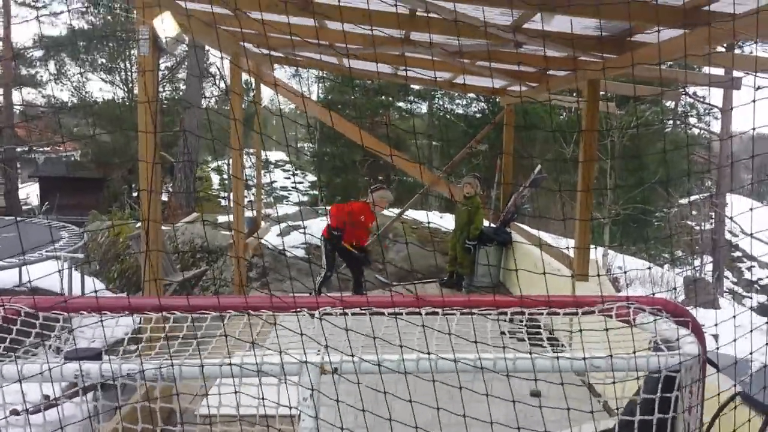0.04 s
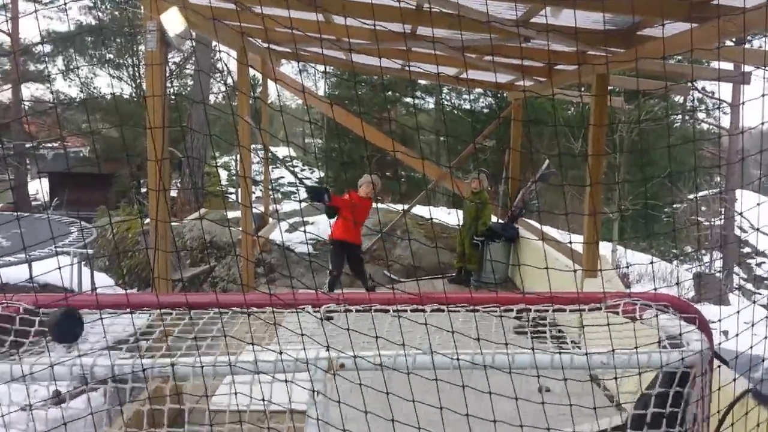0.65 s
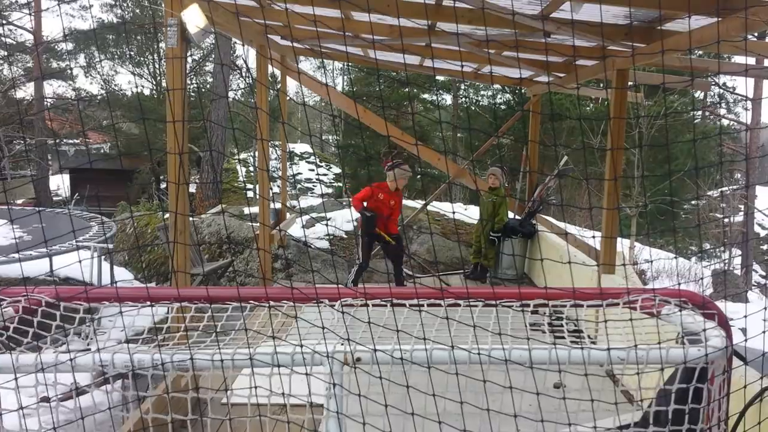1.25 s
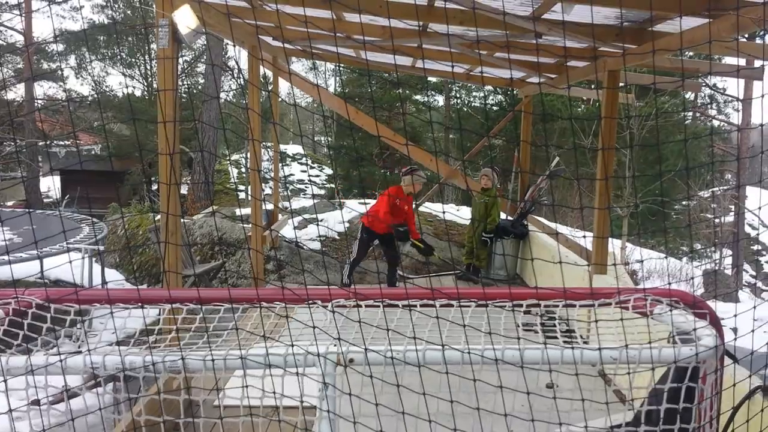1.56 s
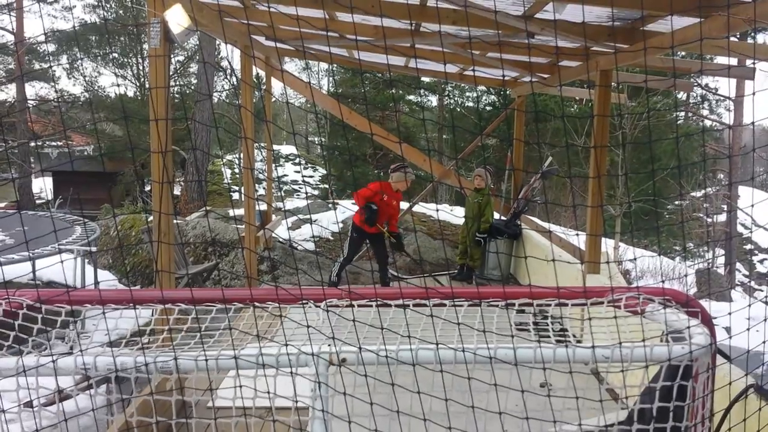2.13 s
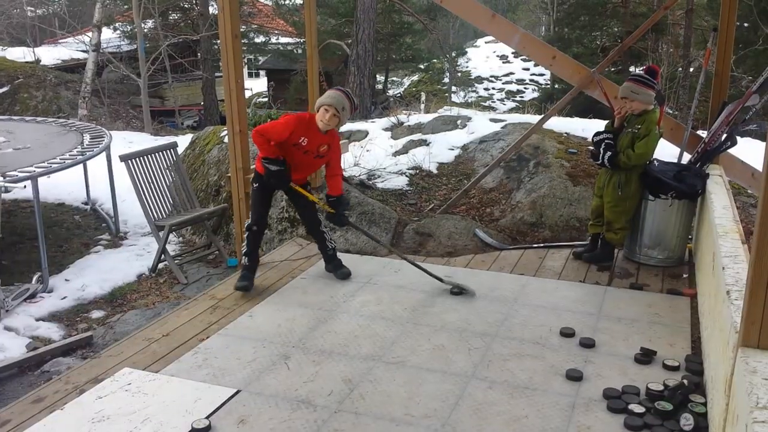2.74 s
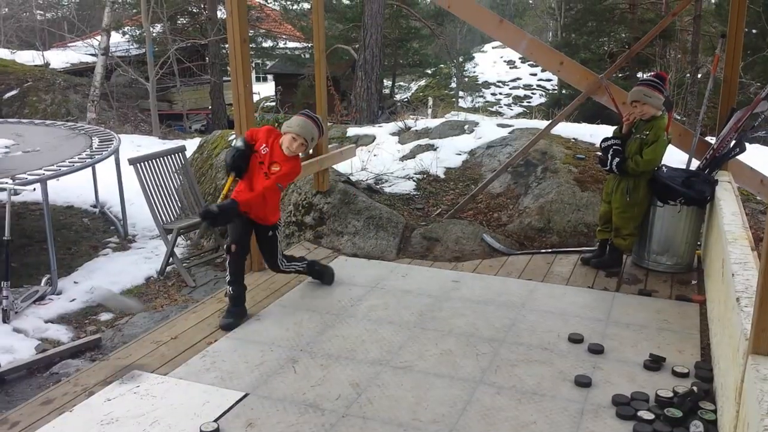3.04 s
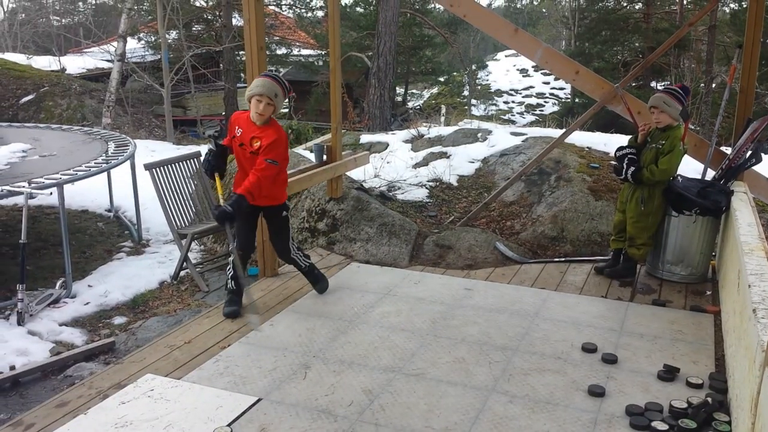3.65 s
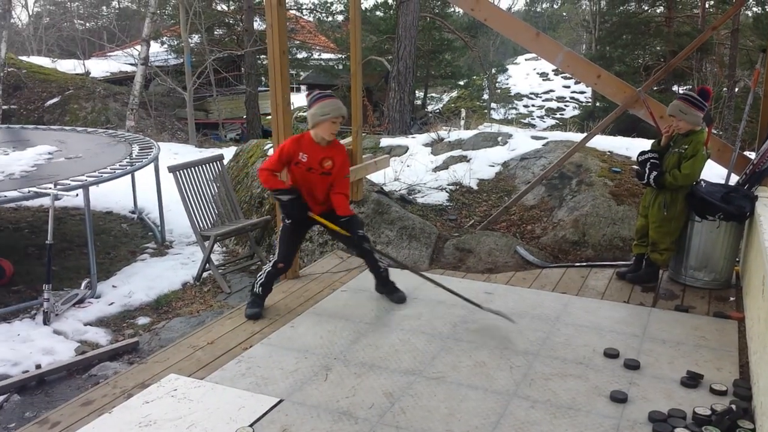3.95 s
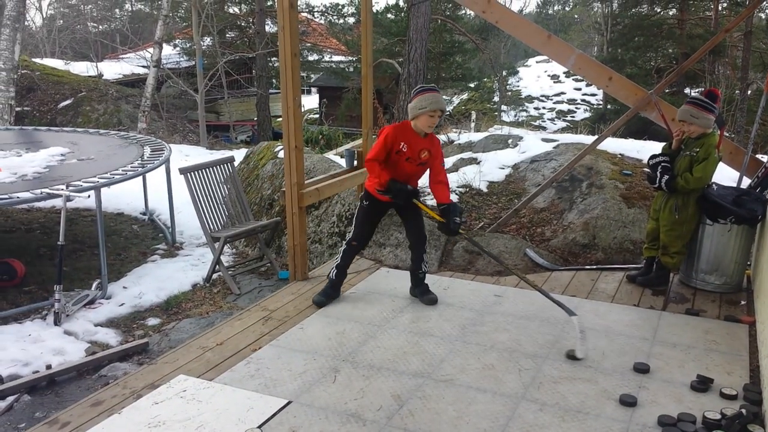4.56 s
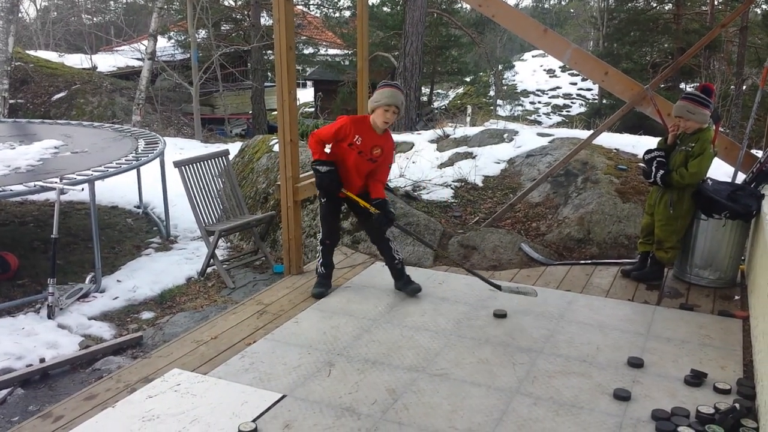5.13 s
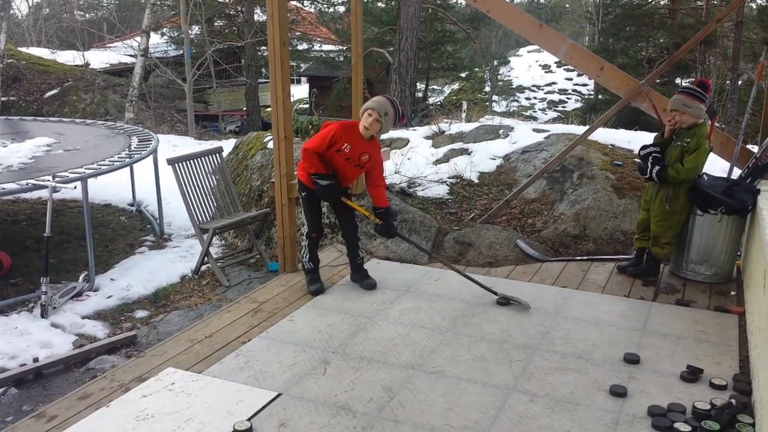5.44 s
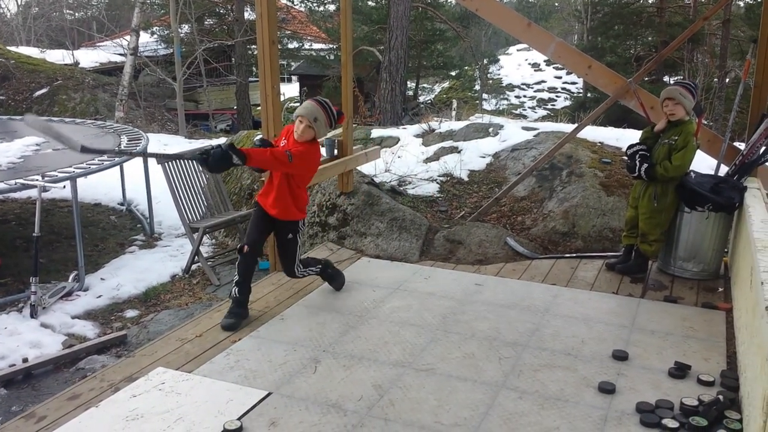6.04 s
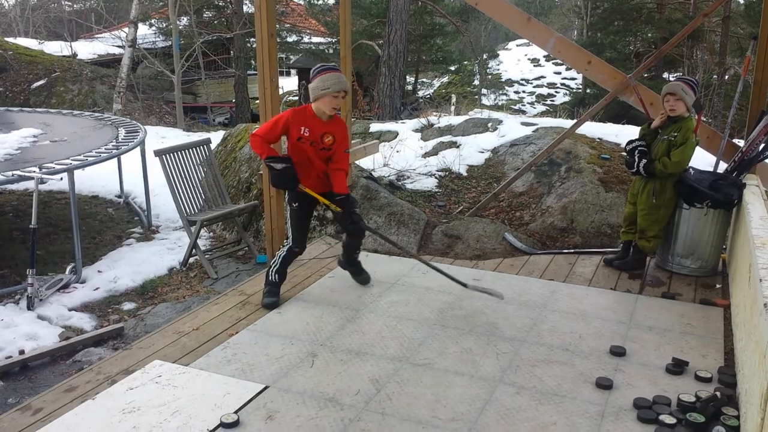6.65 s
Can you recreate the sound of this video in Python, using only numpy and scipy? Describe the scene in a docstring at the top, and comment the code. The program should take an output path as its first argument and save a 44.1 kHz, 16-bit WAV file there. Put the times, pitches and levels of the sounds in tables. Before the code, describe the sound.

A hockey stick rasps over hollow plastic tiles and slaps a puck at about 0.3 seconds. At 0.7 the puck hits a steel goal with a short ring and a net swish, then bounces on planks. Faint taps and scrapes follow, with a brief squeak at 2.2 and two sharp clacks just after. A stronger scrape and slap around 3 seconds send a louder crash into the goal at 3.5, and the puck thuds on wood until about 4.1. Light taps lead into a long drag, with hard clacks near 5 and 5.5 seconds. A scrape swells to a snap just before 6, soles scuff, and a loud knock lands at 6.7. The wooden deck rumbles and booms under feet and hits, more in the second half. Everything is in stereo, with short reflections from the roof over a very faint outdoor hush.

```python
"""A hockey stick taps pucks, drags them over plastic tiles and snaps them away on a roofed backyard rink.
Impact excites the resonances of blade and hollow tiles; stick-slip friction makes them rasp and squeak.
Two shots crash into the goal, whose steel frame rings and net swishes, and the pucks thud on the planks.
The wooden deck rumbles and booms under feet and hard hits; soles scuff; roof and boards scatter blows.
Two small microphones pick this up over the faint hush of the woods."""
import sys
import numpy as np
from scipy import signal
from scipy.fft import rfft, irfft, next_fast_len
from scipy.io import wavfile
from scipy.ndimage import uniform_filter1d, map_coordinates

SR = 44100
rng = np.random.default_rng(int(sys.argv[2]) if len(sys.argv) > 2 else 0)


def file_out(sig):
    """Save sig as 16-bit WAV at sys.argv[1]."""
    # one column per channel
    cols = np.atleast_2d(sig).T
    # limit, then scale
    lim = np.clip(cols, -1, 1)
    pcm = np.round(lim * 32767).astype(np.int16)
    wavfile.write(sys.argv[1], SR, pcm)


N = 303849

# Resonances of blade and hollow tiles. Each row: centre in Hz, width in Hz, peak height in dB.
PAD_MODES = [(98, 19, 6), (274, 21, 4), (403.3, 57, 4), (476, 35, 3), (643.6, 120, 1), (725, 45, 0.5),
             (906, 45, 3), (1938, 91, 5), (2440, 230, 1.5), (4200, 390, 2.5), (4970, 570, 3.5)]
# Spectral envelope of the blade. Each row: frequency in Hz, relative level in dB.
BLADE_SPECTRUM = [(40, -27.5), (70, -6), (220, -6), (340, -8.5), (430, -4.5), (680, -1.5), (1000, -7.5),
                  (1420, -9), (2100, -5), (3100, -10), (6000, -16.5), (8000, -12.5), (12000, -34.5),
                  (14500, -49.5)]
# The puck hitting the goal. Each row: start in seconds, knock level in dB, thump and clack over knock
# in dB, knock resonance in Hz, frame ring in dB, ring tilt in dB per octave, ring length factor,
# net level in dB.
GOAL_HITS = [(0.726, -27, -9, 8.5, 810, -26.5, 1.5, 1, -34.5),
             (3.463, -15.5, -25.5, 4, 780, -21.5, -20, 0.63, -24)]


def amp(db):
    """Decibels to amplitude ratio."""
    return 10 ** (np.asarray(db) / 20)


def unit(x):
    """Normalise to rms 1."""
    return x / np.sqrt(np.mean(x ** 2) + 1e-20)


def along(points, hz):
    """Interpolate (Hz, value) points on a logarithmic frequency axis."""
    f, v = np.transpose(points)
    return np.interp(np.log(hz + 1), np.log(f + 1), v)


def wobble(rate, size=N):
    """Random modulation: a smooth curve through rate Gaussian knots a second."""
    knots = rng.standard_normal(int(size * rate / SR) + 4)
    return map_coordinates(knots, [np.arange(size) * rate / SR])


def filtered(x, response):
    """Linear filtering: multiply the spectrum by a frequency response."""
    m = next_fast_len(x.shape[-1] + SR // 8)
    return irfft(rfft(x, m) * response(np.fft.rfftfreq(m, 1 / SR)), m)[..., :x.shape[-1]]


def register(hz, index):
    """Band-pass gain of one register: 0 thump, 1 knock, 2 clack, 3 crack."""
    # The edges of the four registers in Hz, from low to high.
    edges = [35, 300, 1200, 5500, 14500]
    return ((1 + (edges[index] / (hz + 1)) ** 10) * (1 + (hz / edges[index + 1]) ** 10)) ** -.5


def peaks_db(resonances, hz):
    """Resonance: each mode adds a Lorentzian peak to the gain in dB."""
    return sum(db / (1 + (2 * (hz - centre) / width) ** 2) for centre, width, db in resonances)


def minimum_phase(gain, size=4096):
    """Causality: the minimum-phase impulse response of a body with this gain over frequency."""
    cepstrum = irfft(np.log(gain(np.fft.rfftfreq(size, 1 / SR)) + 1e-6))
    cepstrum[1:size // 2] *= 2
    cepstrum[size // 2 + 1:] = 0
    return irfft(np.exp(rfft(cepstrum)))


def pair_noise(size=N):
    """Spatial coherence: white noise at two microphones, alike in the bass, unrelated in the treble."""
    # Each row: frequency in Hz, correlation between left and right.
    coherence = [(60, .62), (130, .8), (280, .975), (650, .96), (1050, .62), (1550, -.35), (2200, .35),
                 (3100, 0), (14000, .03)]

    def mid_side_gains(hz):
        angle = np.arccos(np.clip(along(coherence, hz), -1, 1)) / 2
        return np.array([np.cos(angle), np.sin(angle)])
    mid, side = filtered(rng.standard_normal((2, size)), mid_side_gains)
    return np.array([mid + side, mid - side])


def coloured_noise(spectrum, size=N):
    """Spectral shaping: stereo noise of rms 1 with an envelope of (Hz, dB) points."""
    return unit(filtered(pair_noise(size), lambda hz: amp(along(spectrum, hz))))


def add(track, start, sound):
    """Superposition: mix a sound in at a start time in seconds."""
    part = track[:, round(start * SR):][:, :sound.shape[-1]]
    part += sound[..., :part.shape[-1]]


def air():
    """Ambient noise: the faint steady hush of the woods."""
    # Each row: frequency in Hz, relative level in dB.
    hush_spectrum = [(15, -38.5), (25, -11.5), (141, 4), (260, -3), (297, -2), (885, -7), (1470, -20),
                     (2930, -19), (4860, -14.5), (8960, -30.5), (14500, -23)]
    return amp(-63) * coloured_noise(hush_spectrum)


def deck():
    """Structure-borne sound: the deck rumbles, and booms under footfalls, stick hits and a shot."""
    # Spectral envelope of the deck. Each row: frequency in Hz, relative level in dB.
    deck_spectrum = [(15, -34.5), (25, -14), (48, 0), (107, 4), (195, -5), (230, -4), (260, -9), (307, -7),
                     (350, -18.5), (460, -35), (770, -120)]
    # The continuous rumble as the player moves. Each row: time in seconds, level in dB.
    rumble_levels = [(0.0, -47.5), (0.19, -52), (1.48, -71), (2.32, -44.5), (2.63, -54), (2.99, -51),
                     (3.22, -38.5), (4.34, -55.5), (5.1, -36.5), (5.28, -45.5), (5.74, -38), (6.39, -50),
                     (6.52, -34.5), (6.89, -40)]
    # Footfalls, hard stick hits and the shot into the goal. Each row: start in seconds, strength in dB.
    booms = [(0, -54), (0.25, -44), (0.725, -37.5), (2.27, -53), (3.0, -38), (3.11, -27), (3.63, -39),
             (3.92, -41), (4.33, -45), (4.8, -45), (4.98, -32), (5.17, -49), (5.48, -32.5), (5.7, -39),
             (5.94, -34), (6.32, -23.5), (6.6, -39), (6.7, -39)]
    rise_s, t60_s = .015, 0.87
    t = np.arange(SR) / SR
    envelope = (1 - np.exp(-t / rise_s)) * amp(-60 * t / t60_s)
    rumble_db = np.interp(np.arange(N) / SR, *np.transpose(rumble_levels))
    power = amp(rumble_db)[None] ** 2
    for start, db in booms:
        add(power, start, (amp(db) * envelope)[None] ** 2)
    return coloured_noise(deck_spectrum) * np.sqrt(power) * amp(2.4 * wobble(14))


def stroke_gains():
    """Friction noise follows the load on the stick: envelopes of hollow pad, rasp and hiss."""
    # Strokes over the tiles. Each row: start and end in seconds, final rasp level in dB,
    # swell over the stroke in dB, pad over rasp in dB, hiss over rasp in dB.
    strokes = [(-0.05, 0.031, -50.5, -4, 6, -9), (0.164, 0.305, -34, 7, -1.5, 1),
               (1.06, 1.156, -62.5, 0, -13, -1), (1.618, 1.671, -65.5, 5, -3.5, -2.5),
               (1.731, 2.06, -57, -2, 1.5, -2.5), (2.117, 2.225, -41, -2.5, -6.5, -3.5),
               (2.323, 2.487, -41.5, 1.5, 1.5, -2), (2.62, 2.908, -64, 1.5, 10, -2),
               (2.937, 3.002, -35, 7, -1.5, -1), (3.012, 3.143, -27, 5, -2, -0.5),
               (3.24, 3.31, -52.5, 0, 1, 5.5), (3.84, 3.853, -58, -1, -8, -11),
               (4.224, 4.296, -57.5, -2.5, -13, 3.5), (4.51, 4.694, -61, -6, 1.5, -1.5),
               (4.739, 5.449, -43.5, 6.5, 1, 4.5), (5.55, 5.908, -36.5, 16, -1.5, 0.5),
               (5.946, 5.969, -31.5, 3.5, 4.5, 2.5), (6.11, 6.21, -70.5, -14, -4.5, 5.5),
               (6.356, 6.362, -30.5, 5.5, -3.5, -12), (6.518, 6.568, -34, 2, -10, -9.5),
               (6.864, 6.88, -64.5, -8, 16.5, -5)]
    rise_db_per_s, fall_db_per_s = 266, 196  # the blade settles onto the tiles and leaves them
    echo_db, echo_fall_db_per_s = -15, 52.5  # reverberation under the roof
    t = np.arange(0, N, 64) / SR
    power = np.zeros((3, len(t)))
    for start, end, rasp_db, swell_db, pad_db, hiss_db in strokes:
        before, after = np.maximum(start - t, 0), np.maximum(t - end, 0)
        lean_db = rasp_db + np.interp(t, [start, end], [-swell_db, 0]) - rise_db_per_s * before
        release_db = np.maximum(-fall_db_per_s * after, echo_db - echo_fall_db_per_s * after)
        power += amp(lean_db + release_db + np.array([[pad_db], [0], [hiss_db]])) ** 2
    return [np.interp(np.arange(N) / SR, t, np.sqrt(p)) for p in power]


def patchy(x, depth_db):
    """Moving excitation: as the blade travels, different resonances of the tiles swell and fade."""
    spectrogram = signal.stft(x, nperseg=1024)[2]
    field = uniform_filter1d(rng.standard_normal(spectrogram.shape[1:]), size=4, axis=0)
    field = uniform_filter1d(field, size=6, axis=1)
    return signal.istft(spectrogram * amp(depth_db * unit(field)), nperseg=1024)[1][:, :N]


def slide():
    """Sliding friction: dense tiny slips on the tiles' fine texture also shake the hollow pad."""
    # Spectral envelope of the rubbed tiles. Each row: frequency in Hz, relative level in dB.
    tile_spectrum = [(150, -26), (330, -11.5), (480, -5.5), (700, -2.5), (1000, -12.5), (1450, -13.5),
                     (2100, -12.5), (3200, -14), (5000, -15.5), (6400, -16), (8100, -10.5), (12000, -23.5),
                     (14500, -33)]
    out = np.zeros((2, N))
    chatter_db = 0.88 * wobble(160)
    noise = pair_noise() * amp(1.2 * wobble(1500) + chatter_db)
    tile_gain = lambda hz: amp(along(tile_spectrum, hz) + peaks_db(PAD_MODES, hz))
    for index, gain in enumerate(stroke_gains(), 1):
        slips = noise * amp(1.93 * wobble(45))
        rub = filtered(slips, lambda hz: tile_gain(hz) * register(hz, index))
        out += rub / rub.mean(axis=0).std() * gain
    return patchy(out, depth_db=1.0)


def blows(rows, spectrum, resonances, t60s, contact_t60, rise_s, spiky_db, direct_db):
    """Impact: a click, a brief contact and decaying reflections, convolved with the body's response."""
    out, t = np.zeros((2, N)), np.arange(SR // 3) / SR
    level_window = SR // 40  # a blow's level is its energy spread over 25 ms
    onset = 1 - np.exp(-t / rise_s)
    for start, knock_db, thump_db, clack_db, knock_hz, contact_db, crack_db in rows:
        levels_db = knock_db + np.array([thump_db, 0, clack_db, clack_db + crack_db])
        # the spot that is struck weights the modes anew and adds a broad resonance of its own
        modes = [(centre, width, db + 3.0 * rng.standard_normal()) for centre, width, db in resonances]
        modes.append((knock_hz, knock_hz / 3, 6))
        body_gain = lambda hz: amp(along(spectrum, hz) + peaks_db(modes, hz))
        # single strong reflections stand out of the cloud
        cloud = pair_noise(len(t)) * amp(spiky_db * wobble(697.3, len(t)))
        contact = amp(contact_db - 60 * t / contact_t60)
        for index, t60 in enumerate(t60s):  # seconds to fall 60 dB, one per register
            body = minimum_phase(lambda hz: body_gain(hz) * register(hz, index))
            force = cloud * (amp(-60 * t / t60) + contact) * onset
            force[:, 0] += amp(direct_db)
            sound = signal.fftconvolve(force, body[None], axes=1)[:, :len(t)]
            rms = np.linalg.norm(sound.mean(axis=0)) / np.sqrt(level_window)
            add(out, start, sound * amp(levels_db[index]) / rms)
    return out


def stick():
    """Impulsive excitation: the blade slaps tiles and puck, and the short contact sounds many modes."""
    # Each row: start in seconds, knock level in dB, thump and clack over knock in dB,
    # knock resonance in Hz, contact over reflections in dB, crack over clack in dB.
    slaps = [(0.322, -27, -12, -6, 540, 35, -4), (0.363, -34, -16, 0, 597, 2, -9),
             (0.369, -22.5, -17, 6, 604, -7, -11), (1.111, -54, -16, -12.5, 515, 8, 8),
             (1.409, -56, -2, -2.5, 510, -17, -7), (1.438, -52, -5.5, -6, 493, 0, 4.5),
             (1.565, -70.5, -3, -6.5, 500, 12, 12.5), (1.707, -45.5, -8, -9.5, 550, -12, 0),
             (2.063, -36.5, -20, -11, 565, 4, -5), (2.11, -33.5, -10, -13, 453, -13, 5),
             (2.285, -18.5, -16.5, -2, 615, -4, -4), (2.39, -19.5, -13.5, -4.5, 540, 5, -8.5),
             (2.968, -29.5, -22, -5, 630, -8, -15), (3.037, -23.5, -12, -6.5, 495, -2, -13),
             (3.15, -17, -28, -2.5, 656, -1, -3), (4.322, -32.5, -13, -9, 520, -1, -4),
             (4.463, -34.5, -18, -10, 540, 1, -7.5), (4.978, -16.5, -12.5, -6.5, 500, -4, -1.5),
             (5.084, -20, -12.5, -9, 636, -4, -1), (5.476, -14.5, -24, -5, 850, -12, -5),
             (5.549, -28.5, -8, -2.5, 734, -2, -11), (5.639, -30.5, -4, -11, 670, -15, -17),
             (5.97, -27, -2, -7, 694, 0, -1.5), (6.03, -37.5, -13, -2, 700, 12, -30),
             (6.309, -49.5, 9, 4.5, 660, 2, 8.5), (6.694, -13, -3, -12.5, 490, -7, -12.5)]
    return blows(slaps, BLADE_SPECTRUM, PAD_MODES, t60s=[0.26, 0.25, 0.29, 0.26],
                 contact_t60=0.09, rise_s=0.00024, spiky_db=1.5, direct_db=19.5)


def shots():
    """Collision: the puck strikes the goal with a broadband crash."""
    # Spectral envelope of the goal. Each row: frequency in Hz, relative level in dB.
    goal_spectrum = [(30, 2.5), (130, -11), (280, -6.5), (520, -13), (850, -6.5), (1500, -4), (2540, 0),
                     (4640, 2), (6340, 0.5), (7750, 6), (14500, -13)]
    contact_db, crack_db = 8, -3
    rows = [(*row[:5], contact_db, crack_db) for row in GOAL_HITS]
    return blows(rows, goal_spectrum, resonances=[], t60s=[0.38, 0.15, 0.3, 0.28],
                 contact_t60=0.036, rise_s=0.0031, spiky_db=1.5, direct_db=2)


def frame():
    """Beating: the goal's steel tubes take up the shot and ring in pairs of close modes."""
    # Each row: frequency in Hz, relative level in dB, 60 dB decay time in seconds at length factor 1.
    tube_modes = [(1270, -18.5, 0.44), (1360, -23, 1), (2310, -3.5, 0.67), (2740, -16.5, 0.38),
                  (4021, -14.5, .33)]
    out, t = np.zeros((2, N)), np.arange(SR) / SR
    beat_hz, rise_s = 25, .04
    onset = 1 - np.exp(-t / rise_s)
    for start, *_, ring_db, tilt_db, length_factor, _net_db in GOAL_HITS:
        for hz, db, t60 in tube_modes:
            phase = 2 * np.pi * hz * t + rng.uniform(0, 3.3, (2, 1))
            beat_phase = 2 * np.pi * beat_hz * t + wobble(15, len(t))
            tone = np.sin(phase) + .45 * np.sin(phase + beat_phase)
            level_db = ring_db + db + tilt_db * np.log2(hz / 2000) + 1.2 * wobble(16, len(t))
            add(out, start, tone * amp(level_db - 60 * t / (t60 * length_factor)) * onset)
    return out


def net():
    """Damped transient: the mesh whips tight behind the puck with a short, bright swish."""
    # Each row: frequency in Hz, relative level in dB.
    mesh_spectrum = [(300, -16.5), (2000, -11), (6000, -9.5), (9000, -3), (12500, -5), (14500, -13.5)]
    delay_s, rise_s, t60_s = .064, 0.011, 0.096
    out, t = np.zeros((2, N)), np.arange(SR // 3) / SR
    envelope = (1 - np.exp(-t / rise_s)) * amp(-60 * t / t60_s)
    envelope /= envelope.max()
    for start, *_, net_db in GOAL_HITS:
        add(out, start + delay_s, coloured_noise(mesh_spectrum, len(t)) * envelope * amp(net_db))
    return out


def drops():
    """Modal response: hard rubber pucks fall and bounce, exciting the low modes of hollow planks; the first
    knock is the puck rattling in the goal just after the first shot."""
    # Each row: start in seconds, knock level in dB, thump and clack over knock in dB, # knock resonance in Hz.
    # The first row is the puck rattling in the goal after the first shot.
    bounces = [(0.792, -37, -21.5, 3, 492), (0.82, -33.5, 3.5, -6, 383), (0.86, -44, 9.5, -14, 330),
               (0.906, -55, -6.5, 9, 370), (3.593, -42, 3, -10, 340), (3.655, -30, -3.5, -5.5, 520),
               (3.921, -19.5, -1, -14, 625), (4.024, -40, -5, 3.5, 603), (4.112, -35.5, 2, -16.5, 392)]
    # Spectral envelope of the planks. Each row: frequency in Hz, relative level in dB.
    plank_spectrum = [(40, -30), (80, -12), (200, 2.5), (350, -5.5), (700, -4), (1100, -15.5),
                      (1600, -22.5), (2300, -23.5), (3500, -30.5), (7750, -37), (14500, -52)]
    # Each row: centre in Hz, width in Hz, peak height in dB.
    plank_modes = [(157, 25, 12.7), (252.5, 60, 5.7), (435, 29, 5.3)]
    contact_db, crack_db = 3, -17
    rows = [(*row, contact_db, crack_db) for row in bounces]
    return blows(rows, plank_spectrum, plank_modes, t60s=[0.2, 0.22, 0.25, 0.43],
                 contact_t60=0.044, rise_s=0.00058, spiky_db=3.5, direct_db=18)


def squeaks():
    """Stick-slip oscillation: for a moment the blade's slips fall roughly into step and sing."""
    # Each row: centre time in seconds, pitch in Hz, strength in dB, half-length in seconds.
    squeals = [(2.195, 2950, -48, 0.032), (2.221, 2900, -38.5, 0.026), (2.228, 1130, -40.5, 0.032)]
    out = np.zeros((2, N))
    for centre, hz, db, half_length in squeals:
        t = np.arange(int(2 * half_length * SR)) / SR
        grip = 2 * wobble(160, len(t))
        add(out, centre - half_length, amp(db) * np.hanning(len(t)) * grip * np.sin(2 * np.pi * hz * t))
    return out


def scuffs():
    """Soft impact: soles land on the tiles with hardly any crack."""
    # Each row: start in seconds, knock level in dB, thump and clack over knock in dB,
    # knock resonance in Hz.
    landings = [(6.018, -30, 3, 0.5, 335), (6.322, -33, 3, 6.5, 580), (6.524, -35.5, 2, -1, 336)]
    contact_db, crack_db = -2, -23
    rows = [(*row, contact_db, crack_db) for row in landings]
    return blows(rows, BLADE_SPECTRUM, PAD_MODES, t60s=[0.23, 0.13, 0.2, 0.22],
                 contact_t60=0.08, rise_s=0.0015, spiky_db=4.5, direct_db=10)


def scene():
    """Superposition: the pressures of all sources on the rink add."""
    return (air() + deck() + slide() + stick() + shots() + frame() + net() + drops()
            + squeaks() + scuffs())


def record(dry):
    """Port resonance colours each microphone; saturation rounds the peaks; a low-pass cuts the top."""
    # Each row: frequency in Hz, left minus right level in dB.
    port_balance = [(60, -3), (400, 2), (1300, 1.5), (2200, 1), (3400, 4), (4600, 7.5), (6000, 3),
                    (7000, -9), (8200, -12.5), (9700, -11), (10700, -20.5), (12000, -17), (14000, -13.5)]
    cutoff_hz, slope_width_hz = 14600, 500

    def port_gains(hz):
        ratio = amp(along(port_balance, hz))
        return np.array([ratio, np.ones_like(ratio)]) * np.sqrt(2 / (1 + ratio ** 2))
    coloured = filtered(dry, port_gains)
    rounded = coloured / (1 + np.abs(coloured) ** 6) ** (1 / 6)
    return filtered(rounded, lambda hz: np.clip((cutoff_hz - hz) / slope_width_hz + .5, 0, 1))


dry = scene()
out = record(dry)
file_out(out)
```